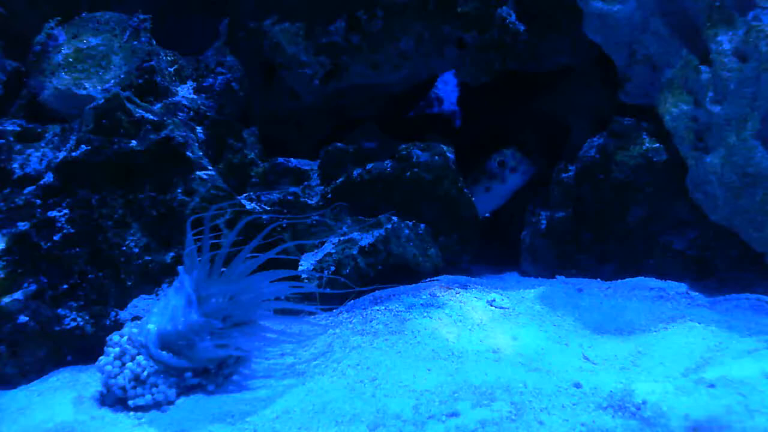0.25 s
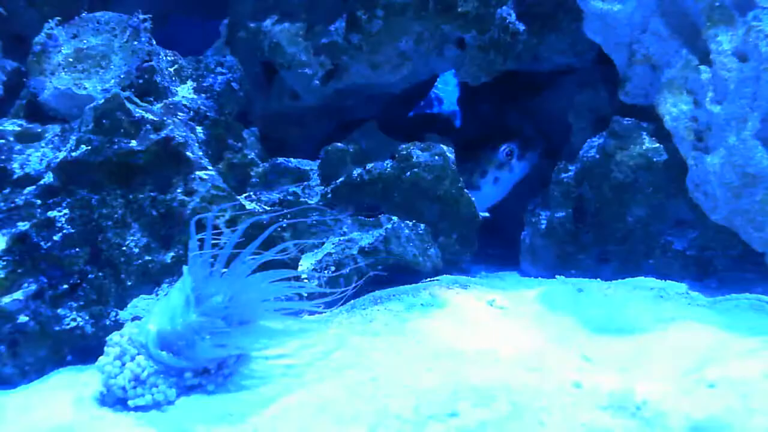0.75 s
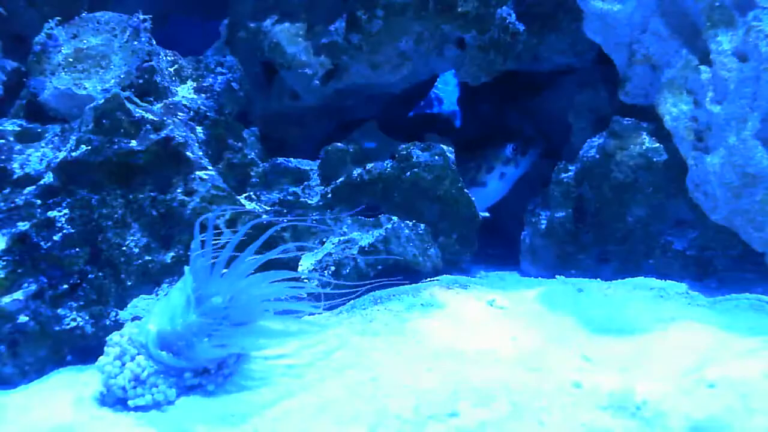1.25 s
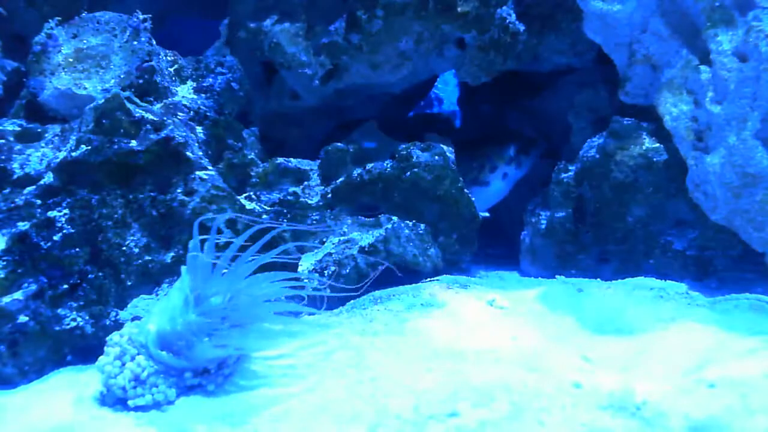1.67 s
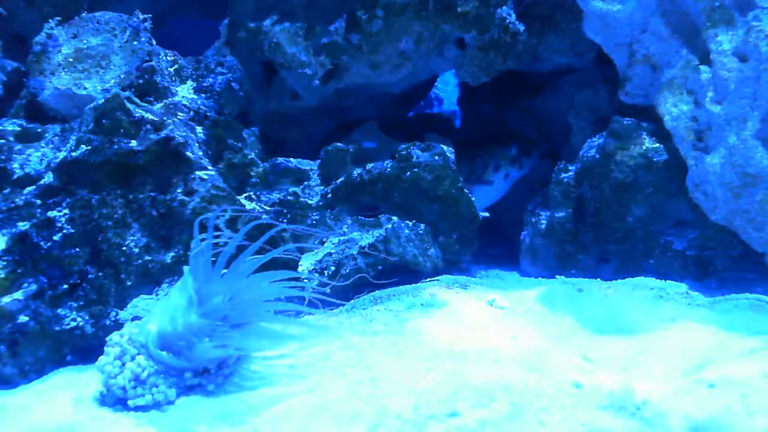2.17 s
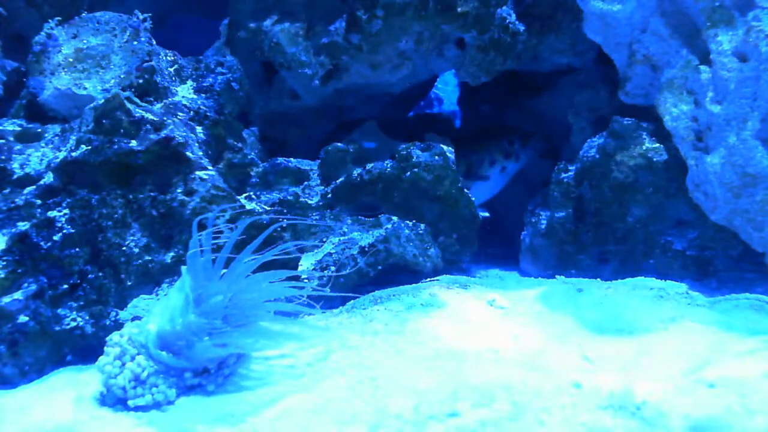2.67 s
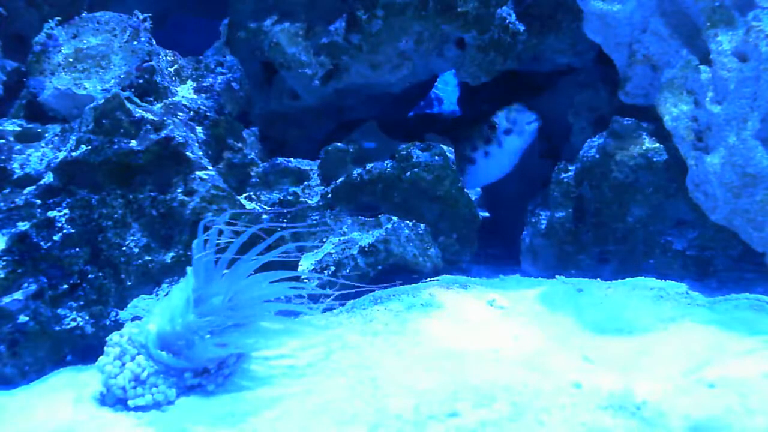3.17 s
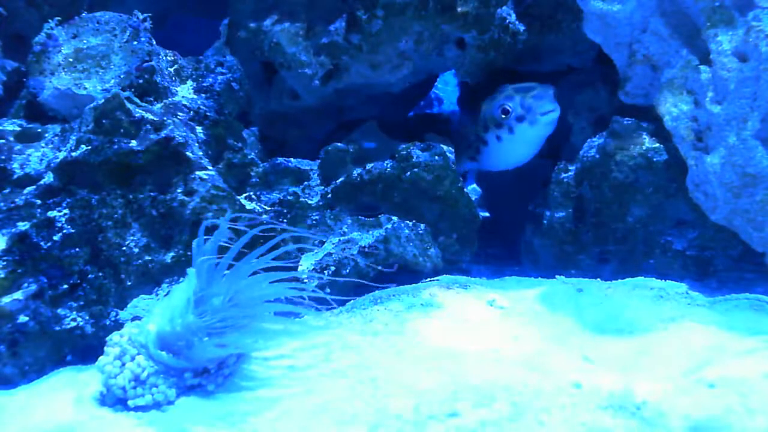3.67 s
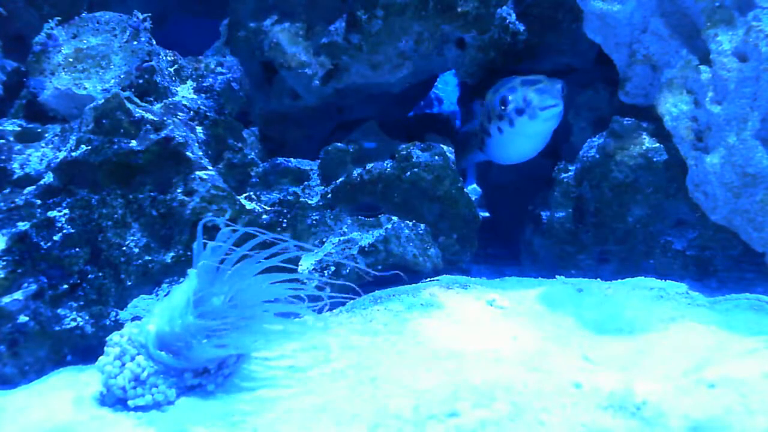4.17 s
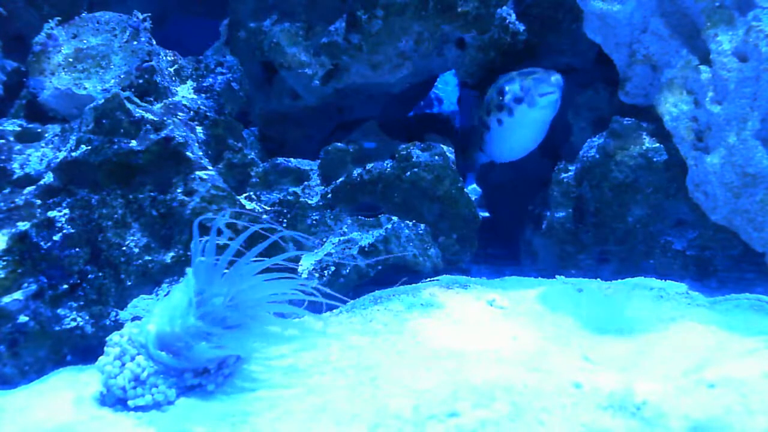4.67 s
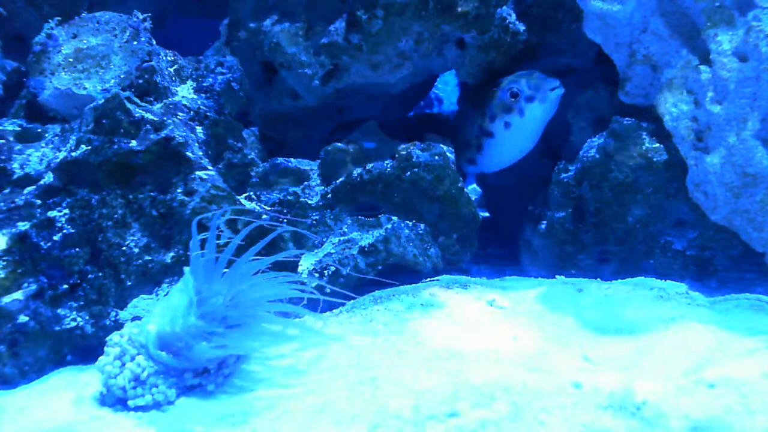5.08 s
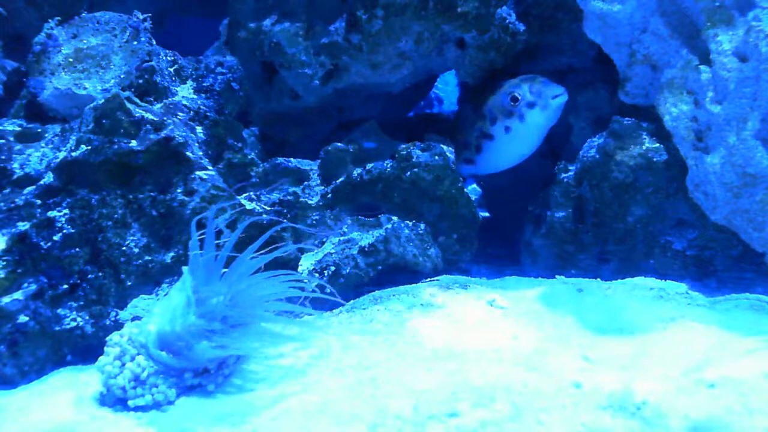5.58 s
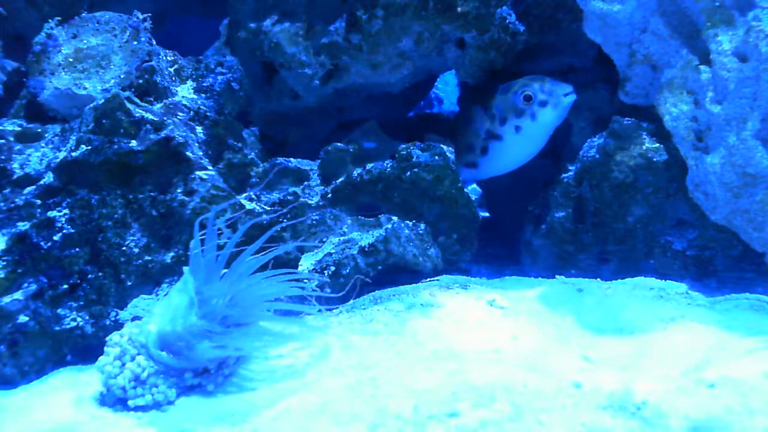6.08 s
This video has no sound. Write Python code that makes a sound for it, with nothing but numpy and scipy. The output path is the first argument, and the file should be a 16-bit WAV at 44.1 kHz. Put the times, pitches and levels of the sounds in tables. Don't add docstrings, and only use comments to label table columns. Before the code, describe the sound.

A button click gives a very short burst of hum, then near silence until the sound opens abruptly. Two aquarium pumps hum low and steadily at mains pitch, with a slow throb and thin whines. Soft water wash and small droplet spits lie around it. A hand-held microphone indoors picks up dull low bumps, and late on the drone skips once.

```python
import sys
import numpy as np
from scipy import signal
from scipy.fft import rfft, irfft, next_fast_len
from scipy.io import wavfile

SR = 44100
rng = np.random.default_rng(int(sys.argv[2]) if len(sys.argv) > 2 else 0)


def volts_from_db(level):
    exponent = np.asarray(level, float) / 20
    return 10 ** exponent


def int16_out(signal):
    q = np.round(np.clip(np.atleast_2d(signal).T, -1, 1) * 32767)
    wavfile.write(sys.argv[1], SR, q.astype(np.int16))


N = 278315
LOST_S, LOST_SAMPLES = 5.4233, 1024
LONG = N + LOST_SAMPLES
PRESS_S = 0.0976


def drift(rate_hz):
    pole = np.exp(-80 * np.pi * rate_hz / SR)
    noise = rng.standard_normal(LONG // 40 + 4002)
    slow = signal.lfilter([1], [1, -2 * pole, pole * pole], noise)[4000:]
    slow = (slow - slow.mean()) / slow.std()
    return np.interp(np.arange(LONG) / 40, np.arange(len(slow)), slow)


def orders(hz, table, trough_s):
    turn = 2 * np.pi * hz * (np.arange(LONG) / SR - trough_s)
    return -np.sqrt(2) * sum(volts_from_db(db) * np.cos(k * turn) for k, db in table)


def mains_hum():
    mains_hz = 59.988
    # multiple of the mains, level/dB rms
    first_pump = [(1, -21), (4, -35), (5, -41)]
    # multiple of the mains, level/dB rms
    second_pump = [(2, -33.5), (3, -45), (6, -48.5), (7, -48.3), (12, -55), (13, -56)]
    return orders(mains_hz, first_pump, 0.0012) + orders(mains_hz, second_pump, 0.0001)


def slipping_rotor():
    # multiple of the rotor rate, level/dB rms
    harmonics = [(1, -34.5), (2, -47)]
    # t/s, level/dB
    load = [
        (0, 1),
        (1, 2.5),
        (2.5, 0.5),
        (4.5, -2),
        (5.5, -1),
        (6.4, -12),
    ]
    load_db = np.interp(np.arange(LONG) / SR, *np.transpose(load))
    return volts_from_db(load_db + 0.41 * drift(2.9)) * orders(56.385, harmonics, 0.0085)


def whines():
    # f/Hz, wander/Hz
    pitches = [(293.7, .3), (2251.1, .5), (2363.7, .5), (3601.6, .6), (3714.2, .6), (4277, .7), (4979, .1),
               (5038.9, .1), (8640.2, .02)]
    levels_db = [-40, -67, -64, -62.5, -62.5, -69, -77, -76, -69.5]
    out = np.zeros(LONG)
    for (hz, wander_hz), db in zip(pitches, levels_db):
        turn = 2 * np.pi * np.cumsum(hz + wander_hz * drift(0.72)) / SR
        out += np.sqrt(2) * volts_from_db(db + 1.5 * drift(1.5)) * np.sin(turn)
    return out


def wash(patchy_db):
    # f/Hz, level/dB per Hz
    spectrum = [(12, -48), (85, -57), (140, -58.5), (270, -60.5), (330, -61.5), (650, -62.5), (1000, -65),
                (1600, -73.5), (2400, -76), (3800, -82.5), (5000, -88), (10000, -90.5), (12800, -94.5),
                (15000, -93.5)]
    # f/Hz, width/Hz, level/dB
    resonances = [(35, 17, -8), (190, 10, -4), (155.3, 24.4, 8.5), (209.4, 14.3, 12), (227, 8, -1),
                  (273, 15, 0.5), (326, 20, 2.5), (354.7, 11.4, 6.5), (443, 12, -1.5), (504, 14, 3.5),
                  (524.7, 13, -10), (555, 12.3, 6), (624, 39, 2.5), (765, 27, -6.5), (857, 14, 2.5),
                  (1034, 29, 1), (5880, 270, 2.5)]
    size = next_fast_len(LONG)
    hz = np.maximum(np.arange(size // 2 + 1) * SR / size, 1)
    spectrum_hz, spectrum_db = np.transpose(spectrum)
    colour_db = np.interp(np.log(hz), np.log(spectrum_hz), spectrum_db)
    for centre_hz, width_hz, peak_db in resonances:
        colour_db = colour_db + peak_db / (1 + (2 * (hz - centre_hz) / width_hz) ** 2)
    rumble_cut = np.minimum(hz / 6, 1) ** 2
    noise = rfft(rng.standard_normal(size)) * volts_from_db(colour_db) * np.sqrt(SR / 2) * rumble_cut

    half_octave = 2 * np.log2(np.clip(hz / 125, 1, 128))
    together = drift(3)
    flow_db = 0.21 * drift(0.96)
    out = np.zeros(LONG)
    for k in range(15):
        band = irfft(noise * np.clip(1 - abs(half_octave - k), 0, 1), size)[:LONG]
        flicker_db = patchy_db * (0.26 * together + drift(7))
        in_flow = 1 < k < 11
        out += band * volts_from_db(flicker_db + flow_db * in_flow)
    return out


def droplets():
    # t/s, f/Hz, level/dB rms
    drops = [(.731, 4600, -57), (.878, 5250, -55), (.955, 7200, -57), (1.14, 5350, -58), (1.638, 7600, -53),
             (2.214, 7250, -54), (2.458, 8650, -61), (2.646, 4150, -49), (2.65, 4900, -58),
             (3.26, 3950, -54), (3.754, 8100, -53), (3.94, 9700, -59), (4.466, 4300, -54),
             (4.508, 9300, -61), (4.856, 11200, -60), (6.038, 4200, -48), (6.045, 5200, -56),
             (6.245, 4050, -52)]
    # t/s, level/dB rms
    sprays = [
        (.74, -56),
        (1.638, -57),
        (2.235, -55),
        (2.27, -56),
        (3.252, -55),
    ]
    bursts = [(s, hz, 450 * (hz / 4000) ** 1.8, db) for s, hz, db in drops]
    bursts += [(s, 9000, 6000, db) for s, db in sprays]
    lead = 2000
    t = np.arange(-lead, 6000) / SR
    rise_s, fall_s = 0.008, 0.022
    shape = np.where(t < 0, np.exp(-(t / rise_s) ** 2), np.exp(-t / fall_s))
    out = np.zeros(N)
    for s, hz, width_hz, db in bursts:
        pole = np.exp(-np.pi * width_hz / SR)
        resonance = [1, -2 * pole * np.cos(2 * np.pi * hz / SR), pole * pole]
        fizz = rng.standard_normal(len(t))
        for twice in range(2):
            fizz = signal.lfilter([1, 0, -1], resonance, fizz)
        puff = volts_from_db(db + 3.5) * shape * fizz / fizz.std()
        at = round(s * SR) - lead
        out[at:at + len(t)] += puff[:N - at]
    return out


def jogs():
    # t/s, peak level/dB, f/Hz (negative swings the other way)
    swings = [(1.432, -21, 20), (1.632, -22.5, 9), (2.432, -20, 19), (3.19, -29, -14), (3.36, -33, 16),
              (3.632, -22, 20), (4.21, -34, 20), (5.03, -25, 10), (5.46, -27, -13), (6.207, -16, 7.5),
              (6.28, -23, 6)]
    t = np.arange(N) / SR
    out = np.zeros(N)
    for s, db, hz in swings:
        swing = np.sin(2 * np.pi * hz * (t - s))
        out -= 1.4 * volts_from_db(db) * swing * np.exp(-(2.2 * hz * (t - s)) ** 2)
    return out


def struck(s, db, hz, t60):
    since = np.maximum(np.arange(N) / SR - s, 0)
    return (since > 0) * volts_from_db(db - 60 * since / t60) * np.cos(2 * np.pi * hz * since)


def knocks():
    # f/Hz, level/dB, t60/s
    case = [(265, -27, .1), (118, -32, .3), (650, -44, .06)]
    # t/s, peak level/dB, f/Hz, t60/s
    ticks = [
        (3.0158, -31, 9500, .0015),
    ]
    press = sum(struck(PRESS_S, db, hz, t60) for hz, db, t60 in case)
    return press + sum(struck(*tick) for tick in ticks)


def settling_offset(opened_s):
    since = np.maximum(np.arange(N) / SR - opened_s, 0)
    rest, overshoot = -0.058, -0.048
    charge_s, settle_s = 0.014, 0.6
    return (1 - np.exp(-since / charge_s)) * (rest + overshoot * np.exp(-since / settle_s))


def high_pass(x, hz):
    return signal.sosfilt(signal.butter(2, hz, "high", fs=SR, output="sos"), x)


def input_blink(dry):
    since = np.arange(N) / SR - PRESS_S
    late = np.maximum(since, 0) / 0.0095
    thump = volts_from_db(-18.5) * (late * np.exp(1 - late)) ** 14
    fade = (since >= 0) * np.clip(1 - since / 0.0465, 0, 1)
    blink = volts_from_db(2.2) * fade * (high_pass(dry, 110) + settling_offset(PRESS_S) - thump)
    creep = (since < 0) * np.clip(1 + since / 0.018, 0, 1)
    return blink + volts_from_db(-20) * creep * high_pass(dry, 900)


def scene():
    steady = mains_hum() + slipping_rotor() + whines() + wash(patchy_db=0.5)
    lost = round(LOST_S * SR)
    steady = np.delete(steady, np.s_[lost:lost + LOST_SAMPLES])
    return (steady + droplets() + jogs() + knocks())[None]


def low_pass(x):
    return signal.sosfilt(signal.butter(12, 16900, fs=SR, output="sos"), x)


def record(dry):
    t = np.arange(N) / SR
    faint_s, half_open_s, open_s = 0.19, 0.3348, 0.3588
    gain_db = np.select([t >= open_s, t >= half_open_s, t >= faint_s], [0, -14, -63], -140)
    mix = input_blink(dry) + volts_from_db(gain_db) * dry + settling_offset(open_s)
    top = signal.ellip(16, 0.1, 70, 15720, fs=SR, output="sos")
    return low_pass(signal.sosfilt(top, mix))


dry = scene()
out = record(dry)
int16_out(out)
```